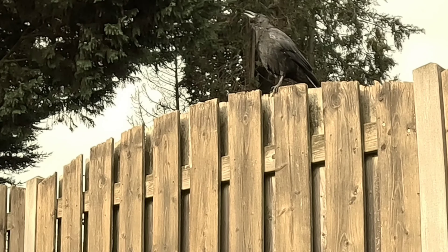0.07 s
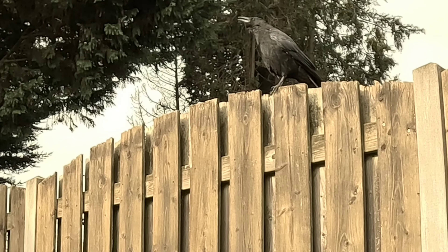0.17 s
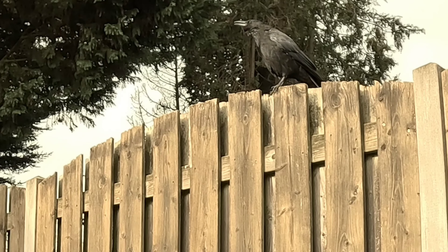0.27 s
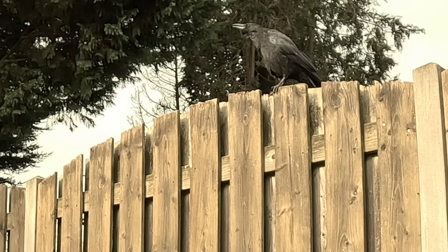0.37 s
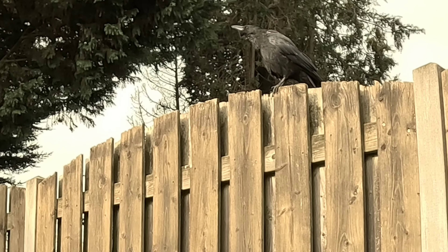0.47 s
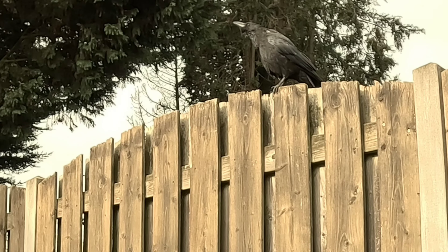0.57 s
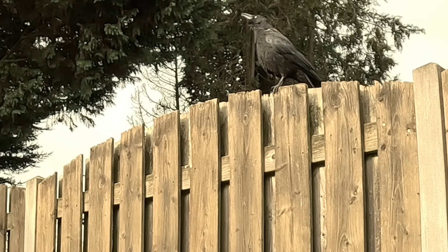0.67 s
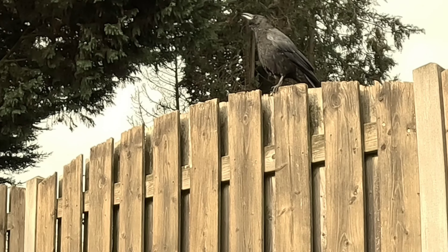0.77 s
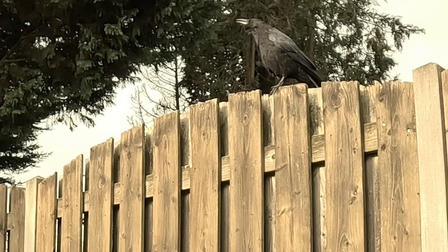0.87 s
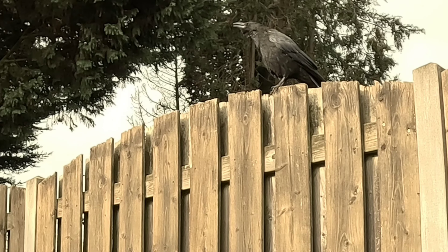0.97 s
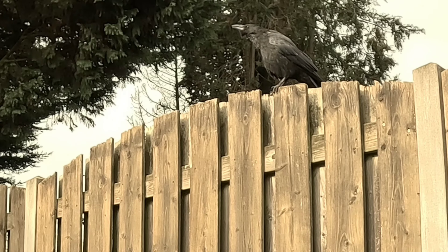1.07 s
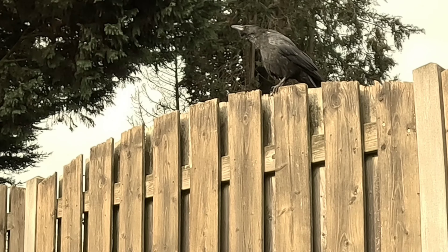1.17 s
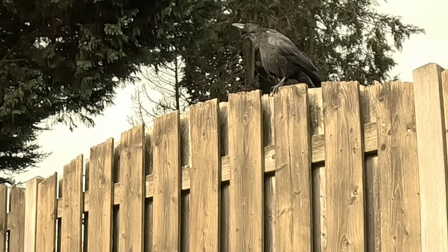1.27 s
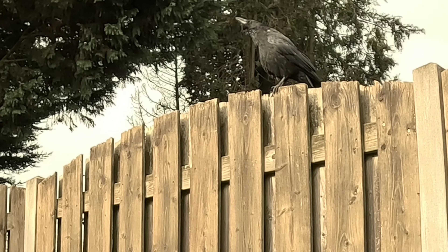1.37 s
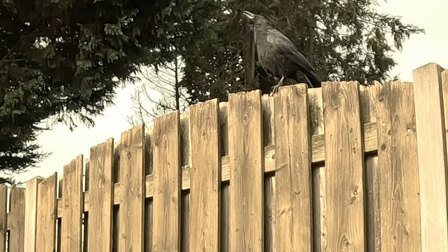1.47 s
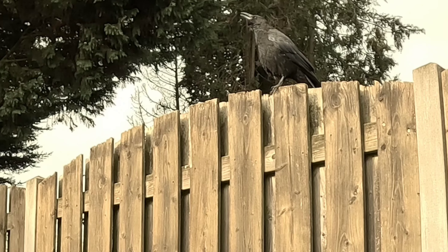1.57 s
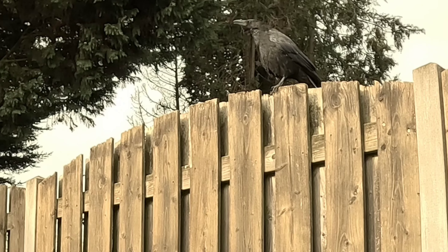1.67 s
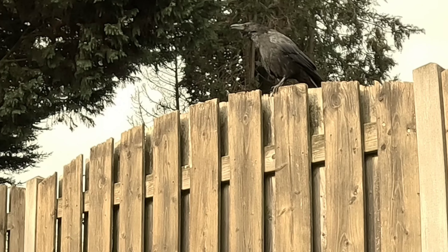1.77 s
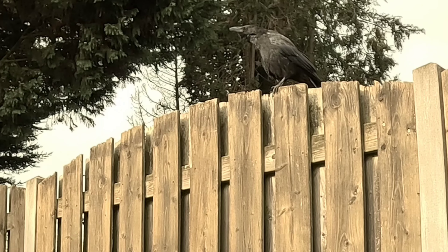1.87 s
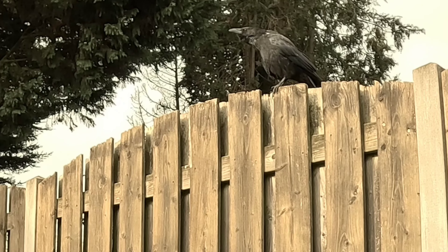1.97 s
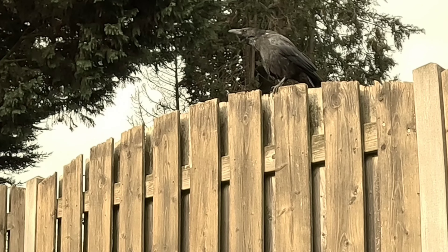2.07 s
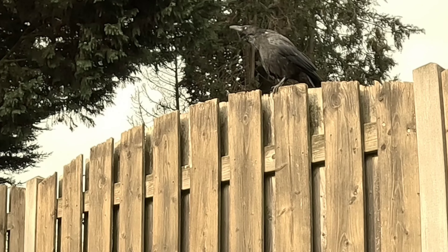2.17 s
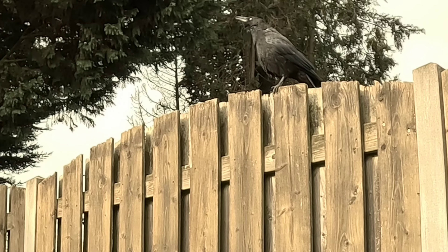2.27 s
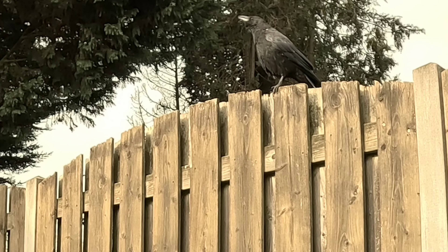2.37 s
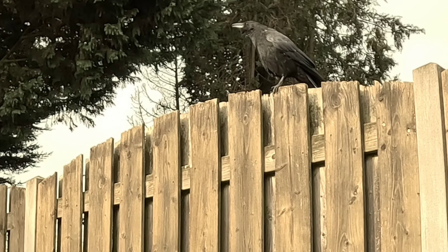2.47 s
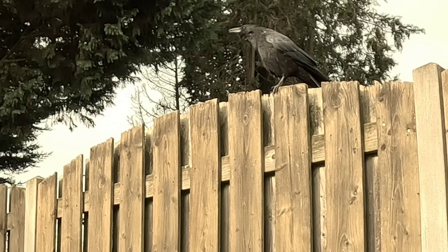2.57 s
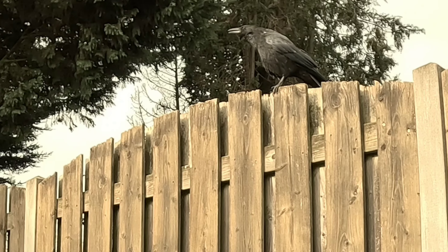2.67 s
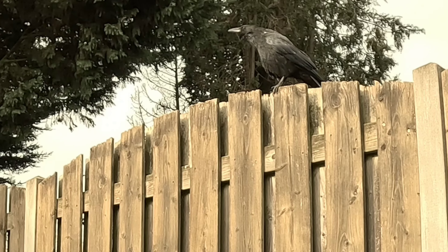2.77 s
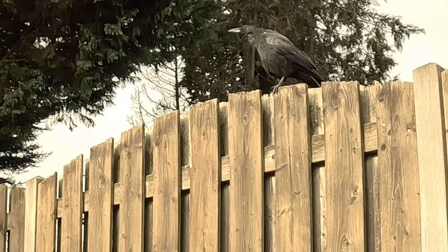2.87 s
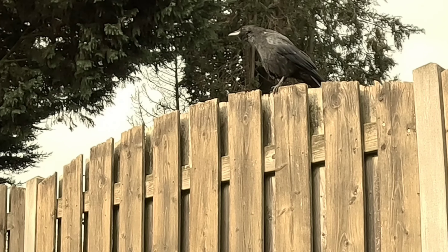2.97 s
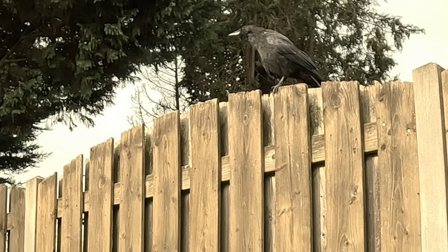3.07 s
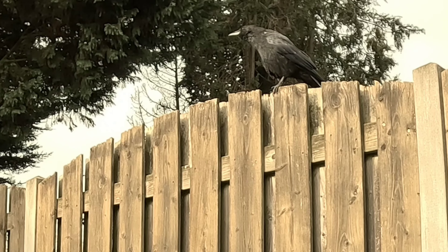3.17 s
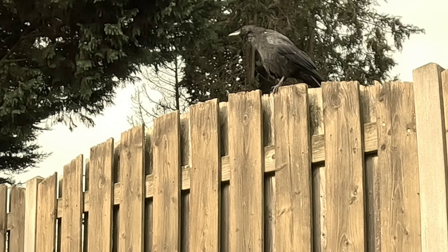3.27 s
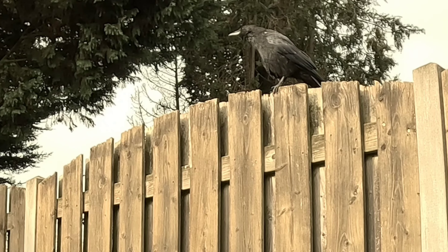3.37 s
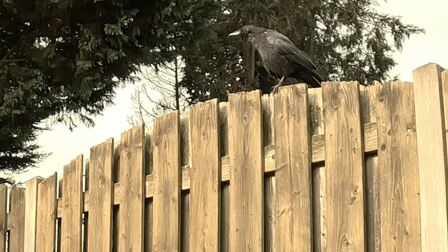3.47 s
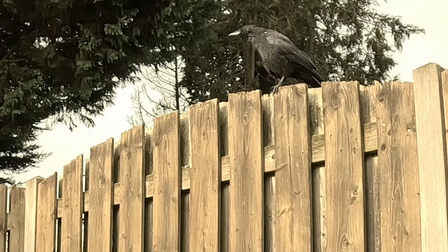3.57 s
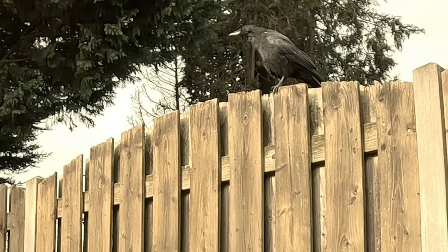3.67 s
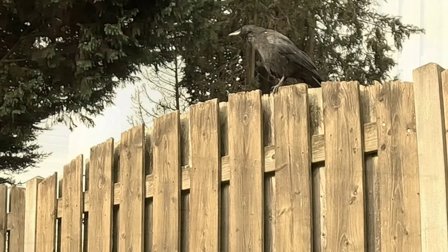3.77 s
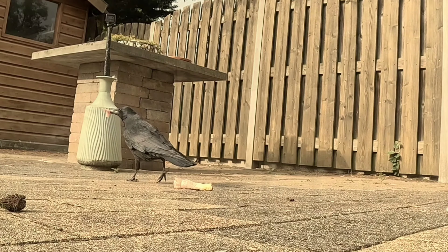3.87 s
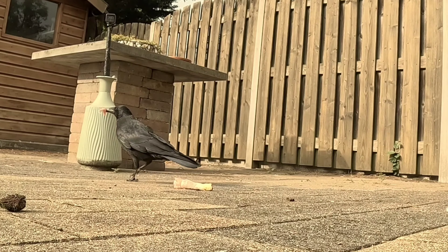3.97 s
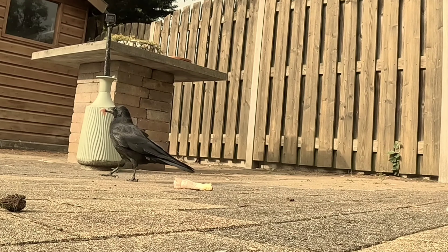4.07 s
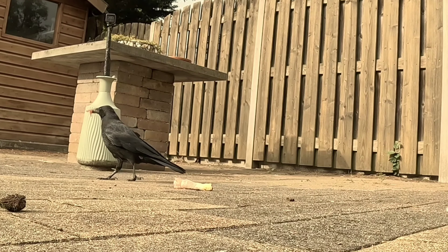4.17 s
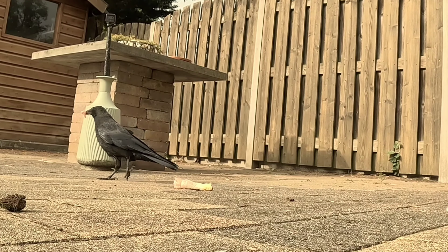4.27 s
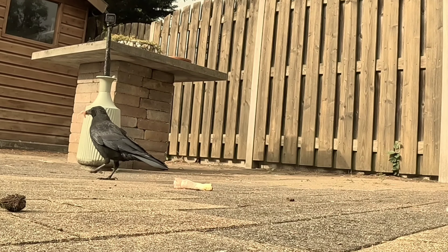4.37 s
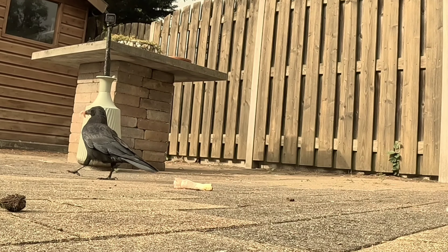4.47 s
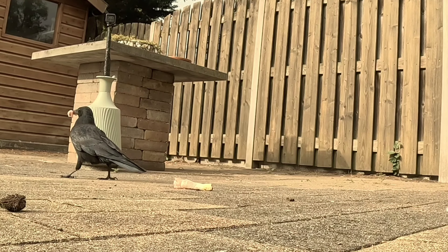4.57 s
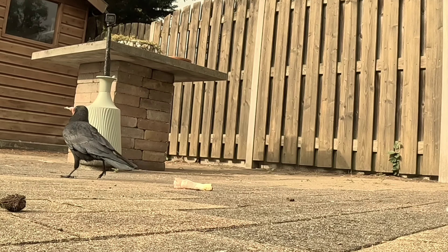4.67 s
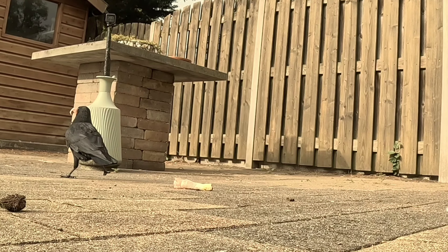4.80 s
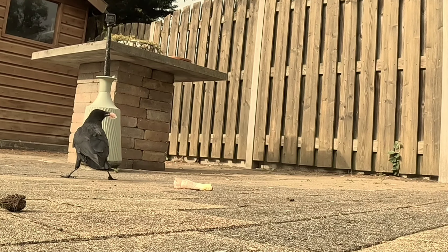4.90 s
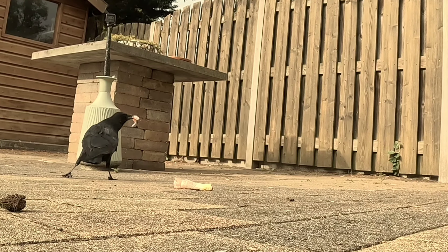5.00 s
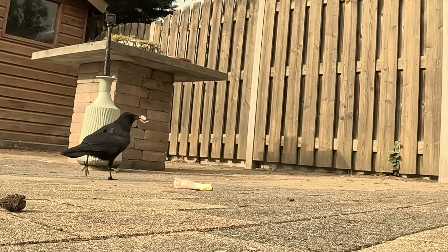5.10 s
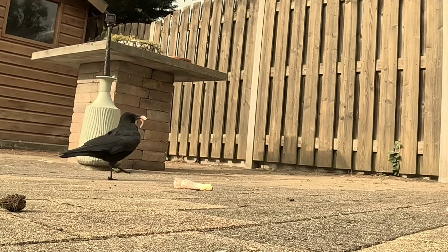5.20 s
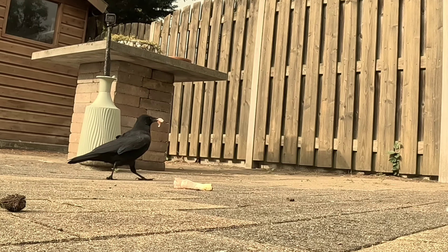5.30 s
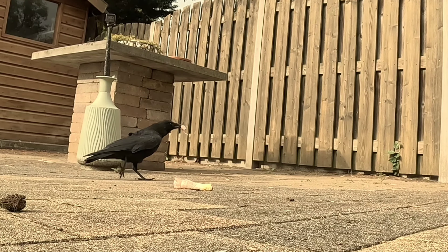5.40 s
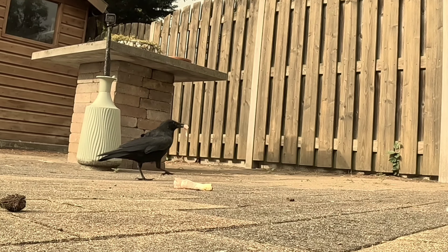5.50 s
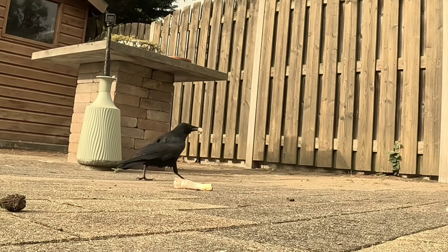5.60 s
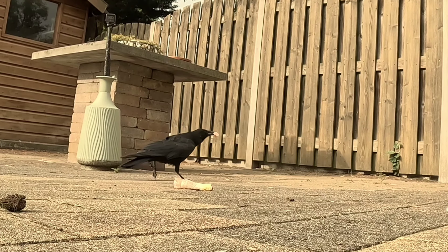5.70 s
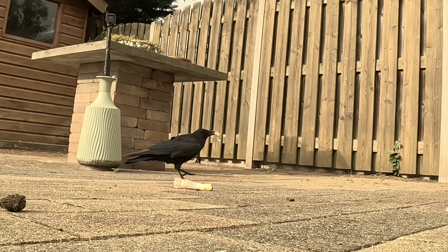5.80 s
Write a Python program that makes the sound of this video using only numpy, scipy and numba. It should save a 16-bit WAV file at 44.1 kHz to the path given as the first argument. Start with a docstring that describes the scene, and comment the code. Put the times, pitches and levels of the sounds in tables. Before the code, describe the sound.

A crow on a garden fence gives four loud, hoarse caws about three quarters of a second apart, each with a short diffuse echo. A low wind thump bumps the microphone midway. After a quiet gap with tiny ticks, distant traffic becomes louder and the crow caws twice more, the last one weaker and cut off.

```python
"""A crow on a garden fence caws four times while fences and walls echo it; a gust thumps the microphone midway.
Something rustles and ticks close by; from about 3.85 s a faint hum is gone and distant traffic is louder.
Wind returns and the crow caws twice more, the last caw cut short by the end.
The voice is a stack of wobbling overtones with breath, shaped by a throat that opens during each caw;
the rest is filtered noise, with decaying sines for ticks and a pressure curve for the thump."""
import sys
import numpy as np
from scipy import signal
from scipy.fft import rfft, irfft
from scipy.io import wavfile
from scipy.ndimage import uniform_filter1d
from numba import njit

SR = 44100
rng = np.random.default_rng(int(sys.argv[2]) if len(sys.argv) > 2 else 0)


def generate_wav(signal):
    """Clip the signal to [-1, 1] and save it as 16-bit WAV at the path in sys.argv[1]."""
    frames = np.transpose(np.atleast_2d(signal))
    scaled = np.clip(frames, -1, 1) * 32767
    pcm = np.round(scaled).astype(np.int16)
    wavfile.write(sys.argv[1], SR, pcm)


def to_linear_factor(level_db):
    """Convert decibel levels (scalar or array-like) to linear amplitude factors."""
    exponent = np.asarray(level_db, float) / 20
    return 10 ** exponent


N = 257544
T = np.arange(N) / SR
RELEASE_S = 0.0684  # time a caw takes to fade once the breath gives out
SWELL_HZ = 45  # how fast the overtones swell on their own


def unit(x):
    """Scale to rms 1."""
    return x / np.sqrt(np.mean(x ** 2))


def ramp(t, length):
    """0 before t = 0, 1 after the given length."""
    return np.clip(t / length, 0, 1)


@njit
def svf(x, hz, width):
    """Band-pass whose centre may move every sample, gain 1 at the centre."""
    y, band, low = np.empty(len(x)), 0., 0.
    for i in range(len(x)):
        g, k = np.tan(np.pi * hz[i] / SR), width / hz[i]
        v = (band + g * (x[i] - low)) / (1 + g * (g + k))
        band, low, y[i] = 2 * v - band, low + 2 * g * v, k * v
    return y


def ring(x, centre, width):
    """Steep resonance: the same band-pass twice."""
    return svf(svf(x, centre, 1. * width), centre, 1. * width)


def walk(rate_hz, size=N):
    """Smooth random drift with spread 1."""
    lowpass = signal.butter(2, rate_hz, fs=SR, output="sos")
    return unit(signal.sosfilt(lowpass, rng.standard_normal(size + SR))[SR:])


def coloured(points):
    """Noise of rms 1 with a given spectrum."""
    hz, db = np.transpose(points)
    f = np.maximum(np.fft.rfftfreq(N, 1 / SR), 1)
    gain = to_linear_factor(np.interp(np.log(f), np.log(hz), db, left=-90, right=-90))
    return unit(irfft(rfft(rng.standard_normal(N)) * gain, N))


def gestures(t, end, level_db, shut_db, effort):
    """What the bird does t seconds into a caw: strength, opening, gape, rasp, windpipe and mouth shares."""
    attack_s = 0.065
    starting = 1 - ramp(t, attack_s)
    dying = ramp(t - end, RELEASE_S)
    # strength rises from 20 dB down, tires by 12.5 dB per second, then falls 19 dB as the breath gives out
    db = level_db - 20 * starting ** 2.2 - 12.5 * np.maximum(t - .1, 0) - 19 * dying ** 1.4
    open_from_s, open_by_s = .08, 0.2658
    opening = ramp(t - open_from_s, open_by_s - open_from_s)
    gape = opening * 0.75 + 0.13 * effort  # a forceful caw opens the beak wider
    # Share of rasp in the voice's power with the beak shut, half open and wide.
    rasp_shares = (.09, .16, .12)
    hoarse = np.interp(opening, (0, .5, 1), rasp_shares)
    # opening moves the windpipe share a fifth past -15 dB; it is stronger at the onset and the end
    pipe_db = shut_db + 1.2 * opening * (-15 - shut_db) + 6.5 * starting + 1.5 * dying
    mouth_db = np.interp(opening, (0, 1), (-1, -5.5)) + 2 * effort * (1 - 0.48 * opening) + 5 * dying
    return db, opening, gape, hoarse, pipe_db, np.minimum(mouth_db, -.3)


def membranes(hz, cycles):
    """Voiced tone: membranes never close sharply, so overtones have scattered phases and swell alone."""
    tone = 0
    for order in range(1, 20):
        swell = to_linear_factor(3.176 * walk(SWELL_HZ, size=len(hz))) * np.exp(-order * hz / 3940.0)
        tone = tone + swell * np.cos(2 * np.pi * (order * cycles + rng.random()))
    return unit(tone)


def throat(source, opening, gape):
    """Upper resonances of the throat, in alternating polarity, gliding as the beak opens."""
    # Throat resonances. Each row: centre in Hz at gape 0, centre in Hz at gape 1, relative bandwidth in Hz
    # (widened below), relative level in dB with the beak shut, partly open and fully open.
    resonances = [(1729.4, 1608.4, 416.6, -8.5, -4.5, 2.5), (1957, 1656.1, 353.3, -5.5, -1.5, 4.5),
                  (2591, 3187.4, 343.6, -14.5, -13, -11), (4920, 5689, 1000, -30.5, -26.5, -20),
                  (7053, 6900, 890, -24.5, -18, -26), (9360, 7300, 3200, -36, -33.5, -32),
                  (13000, 12800, 2000, -38.5, -39, -40)]
    partly_open = 0.26
    upper = 0
    for k, (shut_hz, open_hz, width, *gape_db) in enumerate(resonances):
        centre = shut_hz + gape * (open_hz - shut_hz)
        gain = to_linear_factor(np.interp(opening, (0, partly_open, 1), gape_db))
        upper = upper + (-1) ** k * gain * ring(source, centre, 1.496 * width)
    return upper


def windpipe(t_after_end, hz, breath, hoarse, catching, dying, effort):
    """The windpipe sings the octave with a trace of the fundamental, sliding up into it and down out of it."""
    pipe_hz = 2 * hz * (1 - 0.25 * catching) * (1 - .45 * dying)
    phase = 2 * np.pi * np.cumsum(pipe_hz) / SR
    note = np.cos(phase) + 0.06 * np.cos(phase / 2)
    note = note * to_linear_factor((1.5 + 1.2 * effort) * walk(SWELL_HZ, size=len(hz)))
    sung = note * np.sqrt(1 - hoarse) * (1 - .8 * ramp(t_after_end, 0.01525))
    breathed = 0.56 * np.sqrt(hoarse) * unit(ring(breath, pipe_hz, 220))
    return sung + breathed


def steady(x):
    """Even out the level over about 59 ms."""
    return x / np.sqrt(uniform_filter1d(x ** 2, size=2600, mode="reflect"))


def caw(start_s, end_s, level_db, pipe_db, flap_hz, pitch):
    """One caw: tone and breath through throat, mouth and windpipe; returns its first sample and its sound."""
    start, stop_s = int(start_s * SR), end_s + RELEASE_S
    t = T[start:int(stop_s * SR)]
    n = len(t)
    pitch_points = np.transpose(pitch)
    # effort shows as the held pitch, 0.15 s in, above the usual 414 Hz
    effort = (np.interp(start_s + .15, *pitch_points) - 414) / 18
    db, opening, gape, hoarse, pipe_db, mouth_db = gestures(
        t - start_s, end_s - start_s, level_db, pipe_db, effort)
    # the voice starts in a lower register, then jumps up
    start_hz, jump_at_s, jump_s = 348.36, .03, 0.0121
    hz = start_hz + (np.interp(t, *pitch_points) - start_hz) * ramp(t - start_s - jump_at_s, jump_s)
    catching = 1 - ramp(t - start_s, 0.0444)
    dying = ramp(t - end_s, 0.041)
    # the voice catches and dies as rasp, sagging in pitch at the end
    hoarse = np.clip(hoarse + .45 * catching + .5 * dying, 0, 1)
    flap = np.sin(np.cumsum(2 * np.pi * flap_hz * (1 + .2 * walk(25, size=n)) / SR))
    # Pitch bend by the membrane flap, as a share of the pitch, at gape 0 and gape 1.
    flap_bend = (.015, .04)
    hz = hz * (1 + np.interp(gape, (0, 1), flap_bend) * flap + 0.022 * hoarse * walk(250, size=n))
    cycles = np.cumsum(hz * (1 - 0.23 * dying)) / SR
    tone = membranes(hz, cycles)
    breath = rng.standard_normal(n) * (1 + 0.74 * np.cos(2 * np.pi * cycles))
    pulsing = to_linear_factor((1 + 0.5 * effort) * flap)  # the flap swings the strength too
    clear = tone * np.sqrt(1 - hoarse) * pulsing
    rasp = 2.467 * breath * np.sqrt(hoarse) * pulsing

    upper = throat(clear + rasp, opening, gape)
    mouth = ring(clear + .55 * rasp, np.full(n, 1227.1), 401.5)
    pipe = windpipe(t - end_s, hz, breath, hoarse, catching, dying, effort)
    # the throat gets the power that mouth and windpipe leave, but at least a tenth
    rest = np.sqrt(np.clip(1 - to_linear_factor(mouth_db) ** 2 - to_linear_factor(pipe_db) ** 2, .1, 1))
    voice = rest * steady(upper) - to_linear_factor(mouth_db) * steady(mouth) + to_linear_factor(pipe_db) * steady(pipe)
    fade = np.clip(np.minimum((t - start_s) / 0.00076, (stop_s - t) / 0.0037), 0, 1)
    return start, voice * to_linear_factor(db) * fade


def crow():
    """The caws in turn, each with its own pitch curve."""
    # Caws. Each row: start in seconds, moment the breath gives out in seconds, level in dB before the
    # strength gestures, windpipe share in dB with the beak shut, membrane flap rate in Hz.
    caw_rows = [(0.046, 0.376, -19, -22, 49.92), (0.753, 1.077, -20.5, -10.5, 38.06),
                (1.532, 1.882, -20, -15, 41.7), (2.357, 2.703, -19.5, -21, 48.37),
                (5.074, 5.397, -21, -16, 45), (5.774, 6.1, -25, -11, 38.84)]
    # Pitch once the voice has settled, one curve per caw. Each point: time in seconds, pitch in Hz
    # before the flap and rasp wobble it.
    pitch_curves = [
        [(0.095, 436.8), (0.127, 417.9), (0.235, 418.3), (0.371, 372.2), (0.385, 379.8)],
        [(0.795, 399.7), (0.951, 403), (0.971, 382.8), (0.993, 393), (1.085, 368)],
        [(1.58, 406.3), (1.702, 411.5), (1.76, 397.8), (1.82, 375.5), (1.895, 356.5)],
        [(2.405, 414.7), (2.457, 430.3), (2.523, 425.2), (2.641, 394.8), (2.715, 389)],
        [(5.115, 429.9), (5.183, 423.4), (5.239, 425), (5.395, 389), (5.41, 362.6)],
        [(5.81, 390.3), (5.84, 416)],
    ]
    out = np.zeros(N)
    for row, pitch in zip(caw_rows, pitch_curves):
        start, sound = caw(*row, pitch)
        out[start:start + len(sound)] = sound
    return out


def yard(dry):
    """Diffuse echoes from fences and walls, decaying faster at the ends of the spectrum."""
    # Echo tail. Each row: frequency in Hz, 60 dB decay time in seconds, relative level in dB.
    echo_points = [(404.35, 0.093, -14.5), (800, 0.31, -5), (1470, 0.429, 3.5), (2500, 0.5, -5.5),
                   (5000, 0.32, 4.5), (14000, .25, -7.5)]
    t = T[:SR]
    hz, t60, db = np.transpose(echo_points)
    tail = 0
    for centre in 300 * 2 ** np.arange(0, 5.7, .5):  # half-octave bands
        decay = np.interp(np.log(centre), np.log(hz), t60)
        level_db = np.interp(np.log(centre), np.log(hz), db)
        band = svf(rng.standard_normal(SR), np.full(SR, centre), centre / 1.6)
        tail = tail + band * to_linear_factor(level_db - 60 * t / decay)
    tail = tail * np.clip((t - .006) / 0.0023, 0, 1)  # first echo after 6 ms
    return signal.fftconvolve(dry, tail / np.sqrt(np.sum(tail ** 2)))[:N]


def rustles():
    """Short grainy brushes of noise and dry ticks of decaying sine near the microphone."""
    # Brushes. Each row: middle in seconds, length in seconds between the points at 1/e of the peak,
    # peak level in dB, centre in Hz, bandwidth in Hz.
    brushes = [(1.947, 0.044, -71.5, 8970, 12040), (2.027, 0.015, -66.5, 4500, 4040),
               (2.224, 0.074, -60, 3041, 8800), (2.297, 0.124, -69.5, 4000, 6970),
               (3.311, 0.1, -82.5, 5990, 5000), (3.461, .02, -80.5, 7500, 5000),
               (3.533, 0.057, -80.5, 6000, 6088), (3.73, .02, -75, 7000, 4040),
               (3.771, 0.05, -69.5, 6892, 8900)]
    # Ticks. Each row: start in seconds, starting level in dB, frequency in Hz.
    tick_rows = [(3.31, -61.5, 5930), (3.454, -68, 11100), (3.766, -46, 6150), (3.77, -47.5, 11000),
                 (3.78, -41, 6060), (3.786, -38.5, 12700)]
    out = np.zeros(N)
    for middle_s, length, db, hz, width in brushes:
        grains = rng.standard_normal(N) * to_linear_factor(3.2 * walk(150))
        brush = unit(svf(grains, np.full(N, 1. * hz), 1. * width))
        out += to_linear_factor(db) * brush * np.exp(-(2 * (T - middle_s) / length) ** 2)
    for start_s, db, hz in tick_rows:
        after = np.maximum(T - start_s, 0)
        out += to_linear_factor(db) * np.sin(2 * np.pi * hz * after) * np.exp(-after / 0.00024)
    return out


def wind():
    """Low buffeting as noise around 30 Hz, and one pressure thump on the capsule."""
    # Gusts. Each row: start in seconds, rise in seconds, peak level in dB, later change in dB per second,
    # end in seconds.
    gust_rows = [(1.67, .06, -39, -35, 2.2), (4.4, .7, -50, -8, 5.84)]
    # Thump, suction then a slower push: time in seconds, level in dB before smoothing,
    # dip time in seconds, push decay in seconds.
    thump_settings = (1.994, -11.5, .0045, .014)
    blow = 0
    for start_s, rise, db, fall_db, end_s in gust_rows:
        falling = to_linear_factor(db + fall_db * np.maximum(T - start_s - rise, 0))
        blow = blow + ramp(T - start_s, rise) ** 2 * falling * (T < end_s)
    buffet = unit(svf(rng.standard_normal(N), np.full(N, 30.), 17.0)) * blow
    at, thump_db, dip, push = thump_settings
    after = np.maximum(T - at, 0)
    suction = np.exp(-.5 * ((T - at + dip) / dip) ** 2)
    # the push swings slightly below zero before it settles
    pushing = (1 - np.exp(-after / dip)) * (2.2 * np.exp(-after / push) - .3 * np.exp(-after / .05))
    lowpass = signal.butter(2, 190, fs=SR, output="sos")
    return buffet + to_linear_factor(thump_db) * signal.sosfiltfilt(lowpass, pushing - suction)


def traffic():
    """Rumble, engine drone and tyre hiss from distant roads: shaped noise, louder from about 3.85 s."""
    # Loudness of the traffic. Each row: time in seconds, loudness from 0 (quiet) to 1 (loud).
    loudness_points = [(0, 0.23), (1.5, .03), (3.8, .05), (4.0, 0.726), (4.7, 0.917), (5.1, 0.972),
                       (5.4, 0.52), (5.84, 0.707)]
    # Spectra of the three layers. Each row: frequency in Hz, relative level in dB per Hz.
    rumble, drone, hiss = [(12, -30.5), (20, -10), (64, -2.5), (103, -12.5), (124, -17), (130, -10),
                           (170, -48.5), (290, -120)], [(59, -39), (100, -8), (119, -11), (140, -3.5), (189, -1),
                                           (274, -12.5), (404, -18), (450, -21), (580, -45), (990, -120)], [(210, -32.5), (350, -5.5), (600, -9.5),
                                                          (681, -15.5), (738, -9), (837, -15), (1130, -13),
                                                          (2200, -32), (5800, -46), (8900, -60.5),
                                                          (15500, -52.5)]
    # One row each for rumble, drone and hiss: level in dB when quiet, level in dB when loud,
    # exponent on the loudness (above 1 holds the middle values down).
    layer_levels = [(-54, -48.5, 4.4), (-59.5, -46.5, 1.1), (-65, -60.5, 1.3)]
    loudness = np.clip(np.interp(T, *np.transpose(loudness_points)), 0, 1)
    out = 0
    for spectrum, (quiet_db, loud_db, bend) in zip((rumble, drone, hiss), layer_levels):
        level_db = quiet_db + loudness ** bend * (loud_db - quiet_db) + 0.59 * walk(6.7)
        out = out + coloured(spectrum) * to_linear_factor(level_db)
    return out


def hum():
    """A faint hum of narrow noise bands, heard only until 3.85 s."""
    # Hum bands. Each row: centre in Hz, level in dB, bandwidth in Hz.
    hum_bands = [(195.4, -61.5, 11), (783.6, -70.5, 3.8)]
    end_s, fade_s = 3.85, 0.059
    on = np.clip((end_s - T) / fade_s, 0, 1)
    out = 0
    for hz, db, width in hum_bands:
        out = out + on * to_linear_factor(db) * unit(svf(rng.standard_normal(N), np.full(N, 1. * hz), 1. * width))
    return out


def scene():
    """Crow with its echoes over the background."""
    bird = crow()
    echoes = to_linear_factor(-10) * yard(bird)
    return (bird + echoes + rustles() + wind() + traffic() + hum())[None]


def low_pass(x):
    """Removes everything above the highest recorded frequency."""
    return signal.sosfilt(signal.butter(12, 15680, fs=SR, output="sos"), x)


def record(dry):
    """The scene as finally heard."""
    return low_pass(dry)


dry = scene()
out = record(dry)
generate_wav(out)
```